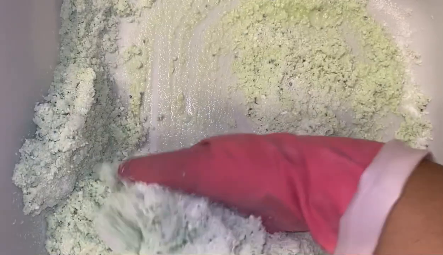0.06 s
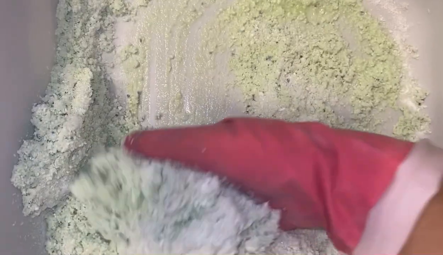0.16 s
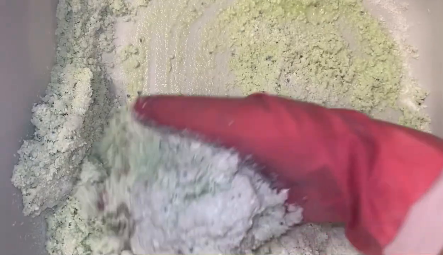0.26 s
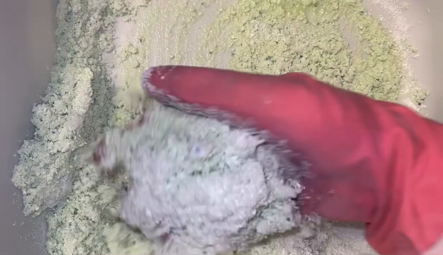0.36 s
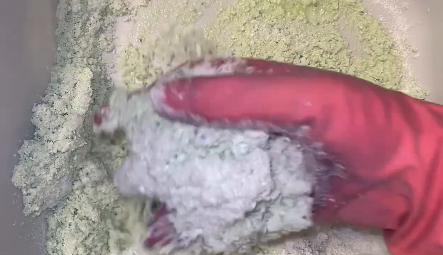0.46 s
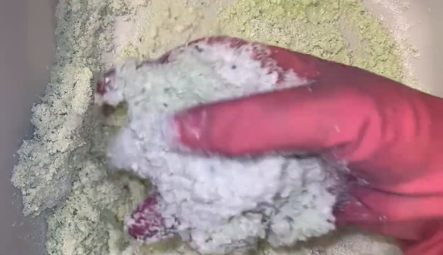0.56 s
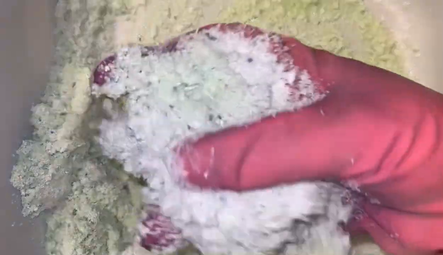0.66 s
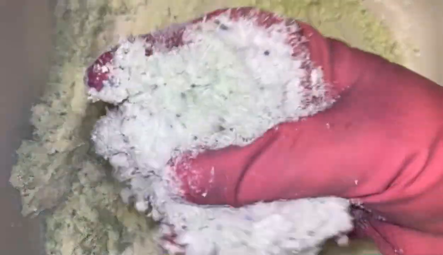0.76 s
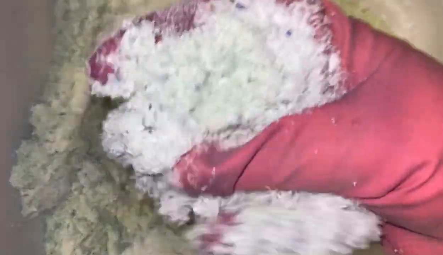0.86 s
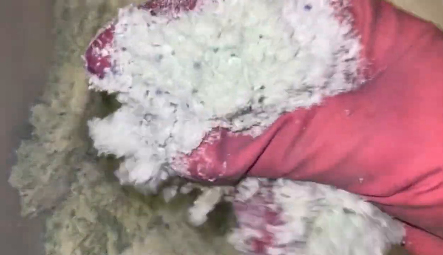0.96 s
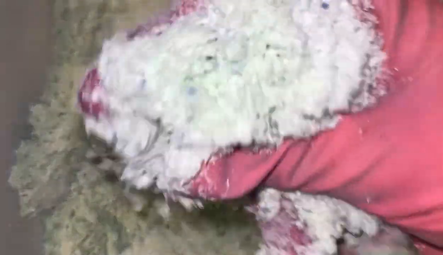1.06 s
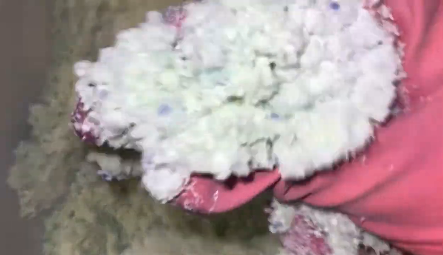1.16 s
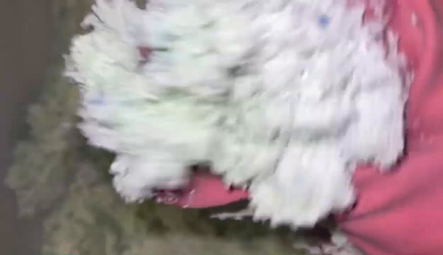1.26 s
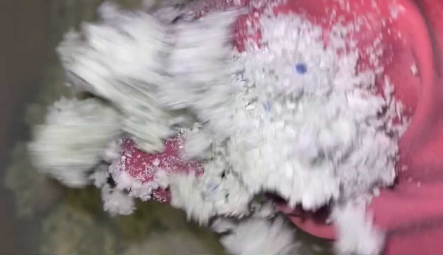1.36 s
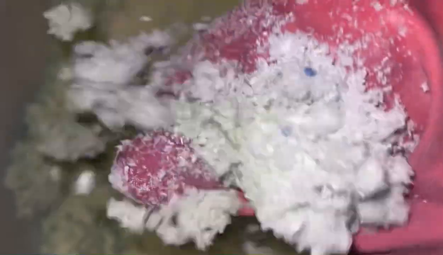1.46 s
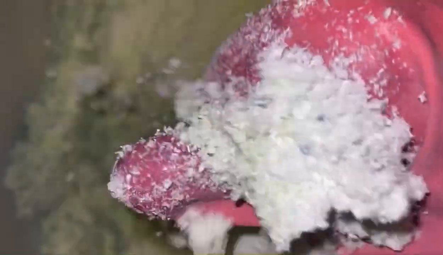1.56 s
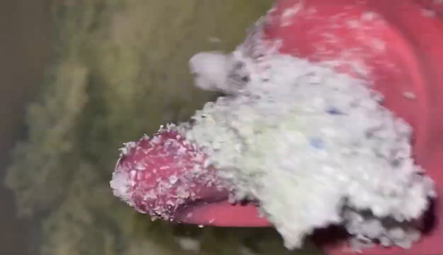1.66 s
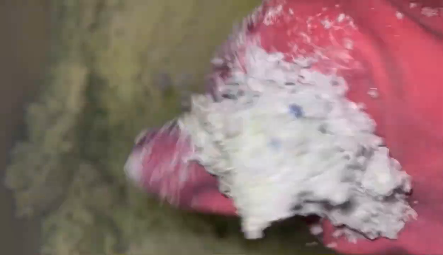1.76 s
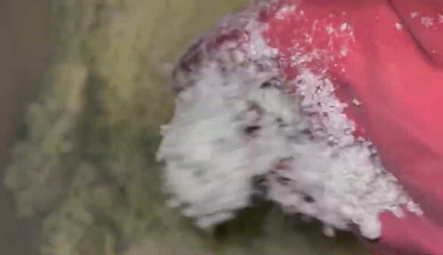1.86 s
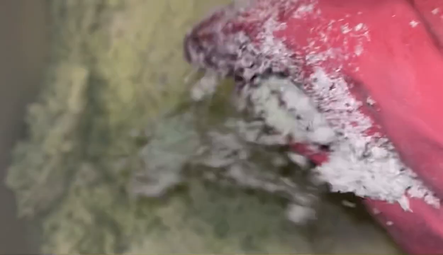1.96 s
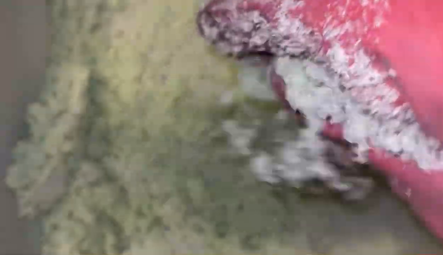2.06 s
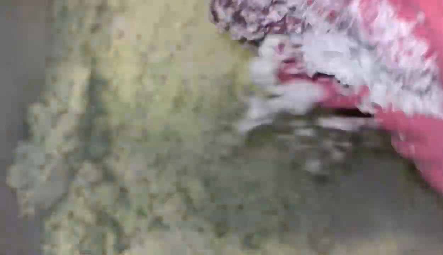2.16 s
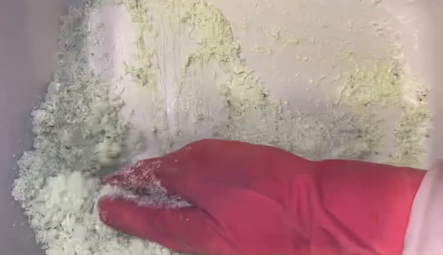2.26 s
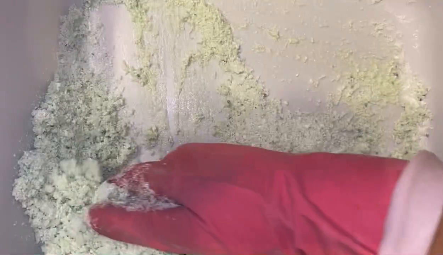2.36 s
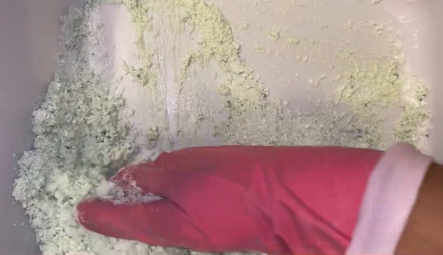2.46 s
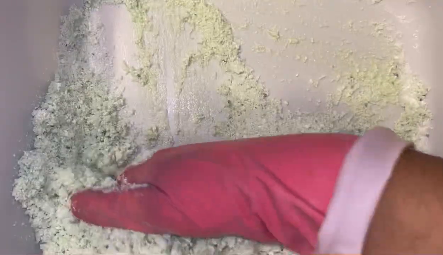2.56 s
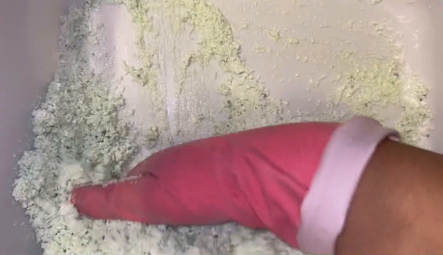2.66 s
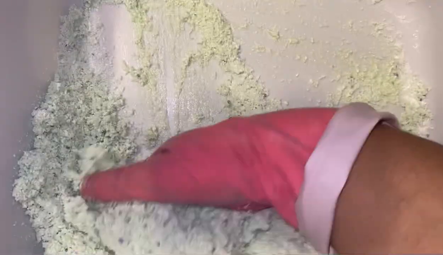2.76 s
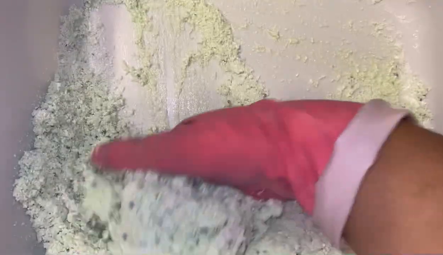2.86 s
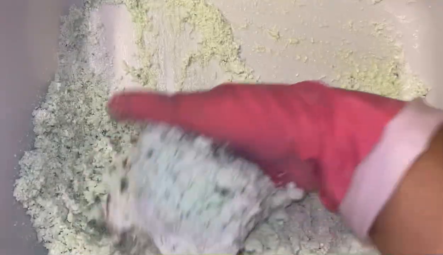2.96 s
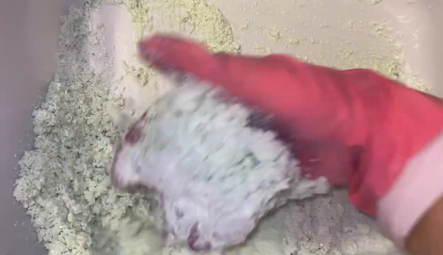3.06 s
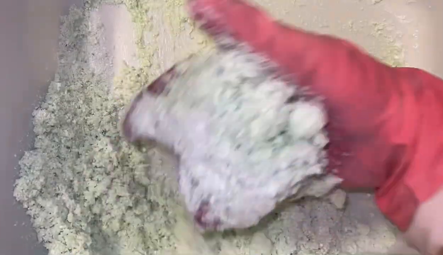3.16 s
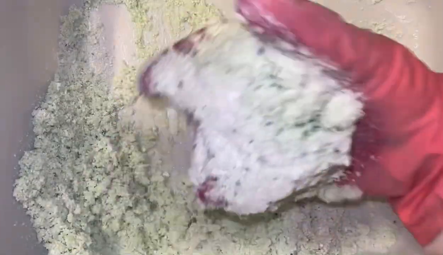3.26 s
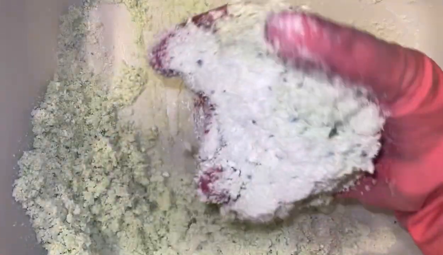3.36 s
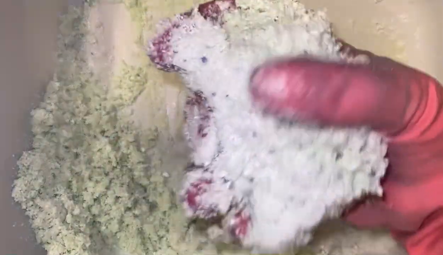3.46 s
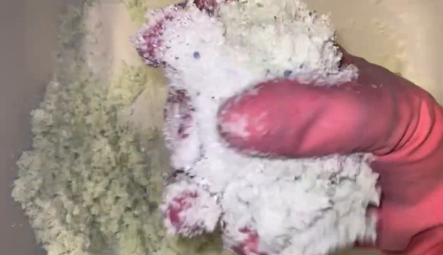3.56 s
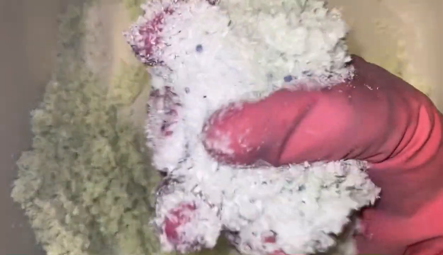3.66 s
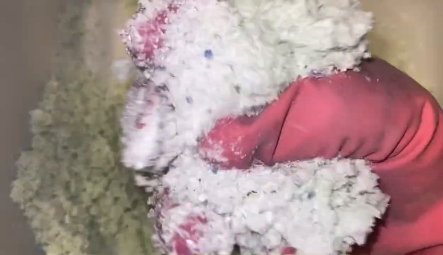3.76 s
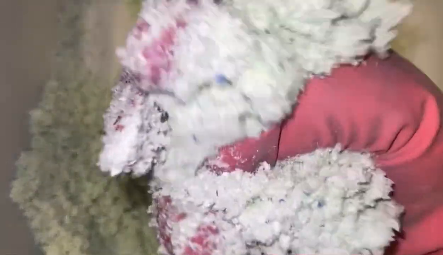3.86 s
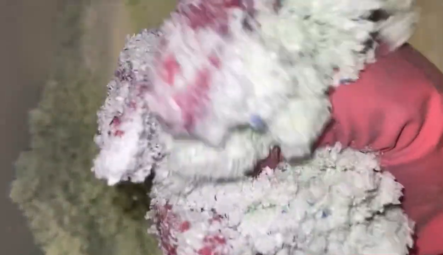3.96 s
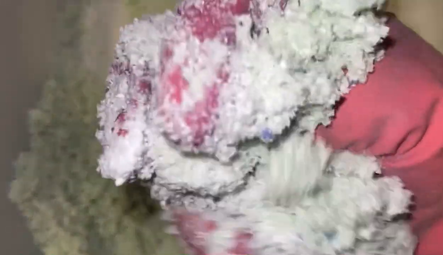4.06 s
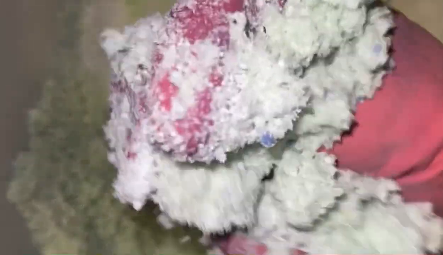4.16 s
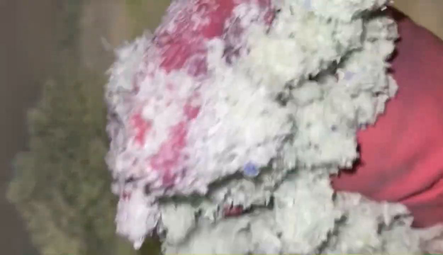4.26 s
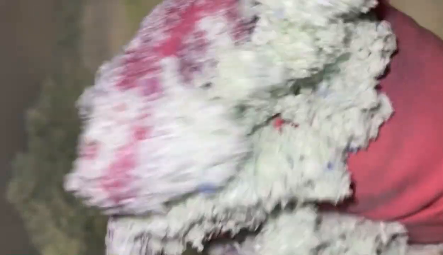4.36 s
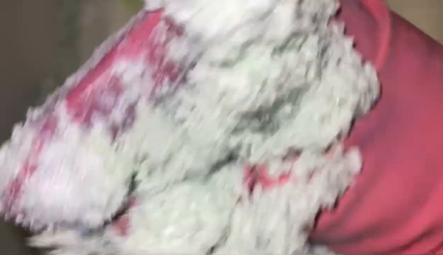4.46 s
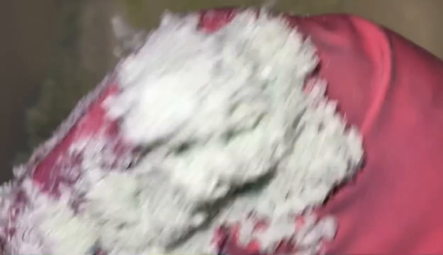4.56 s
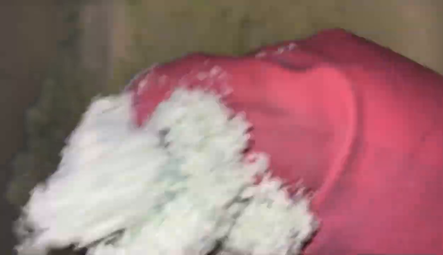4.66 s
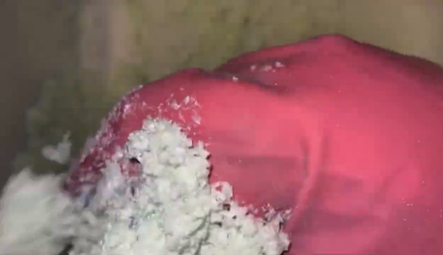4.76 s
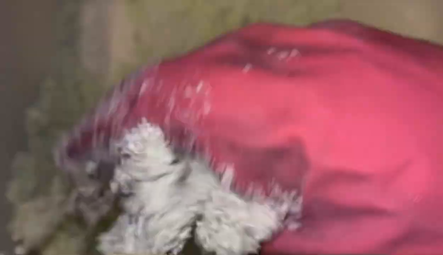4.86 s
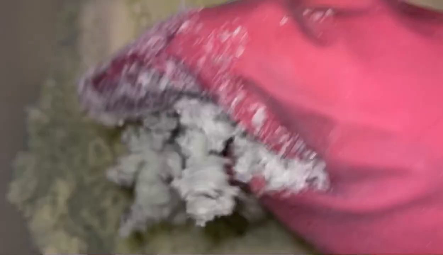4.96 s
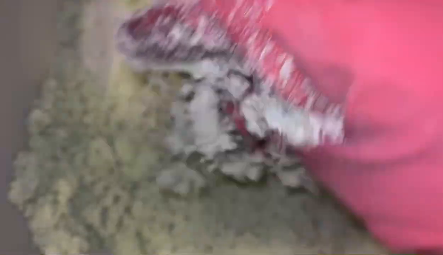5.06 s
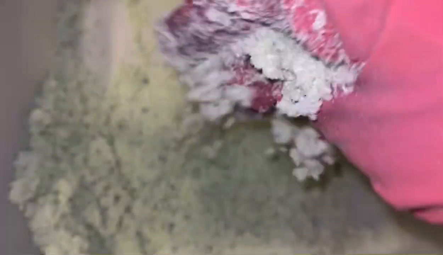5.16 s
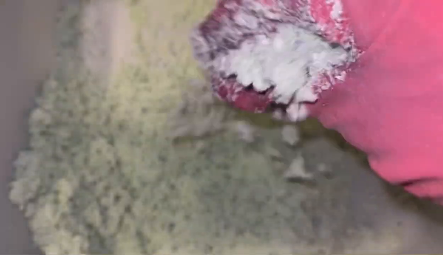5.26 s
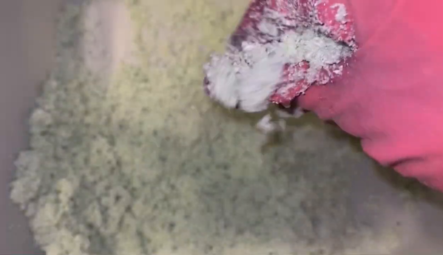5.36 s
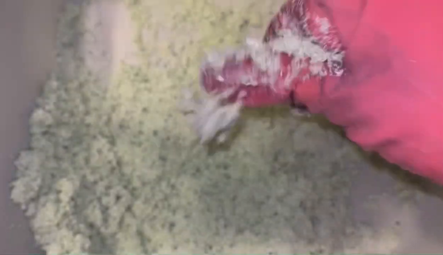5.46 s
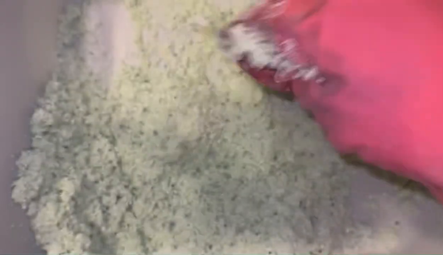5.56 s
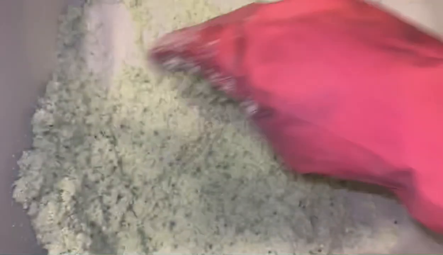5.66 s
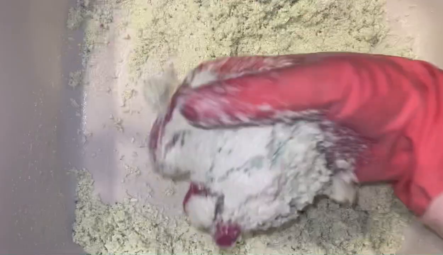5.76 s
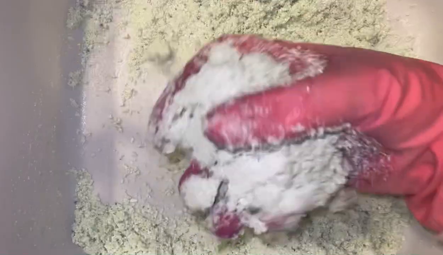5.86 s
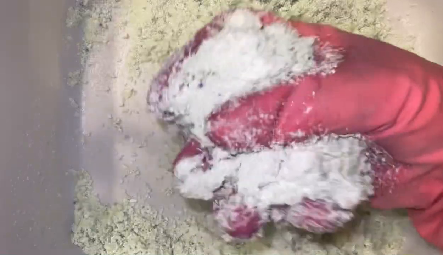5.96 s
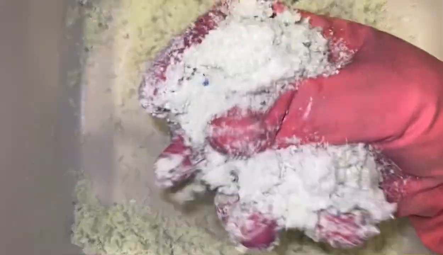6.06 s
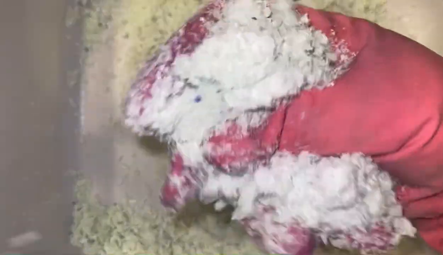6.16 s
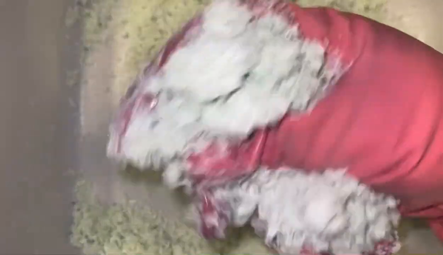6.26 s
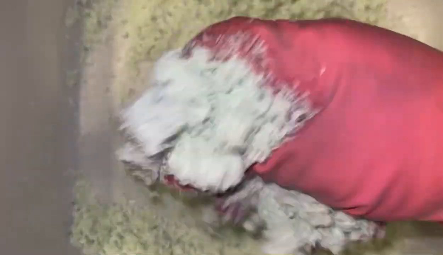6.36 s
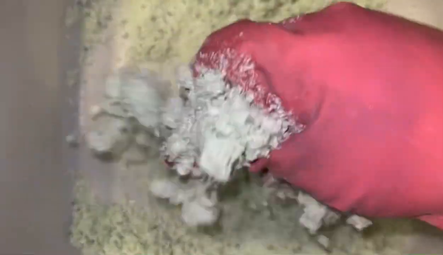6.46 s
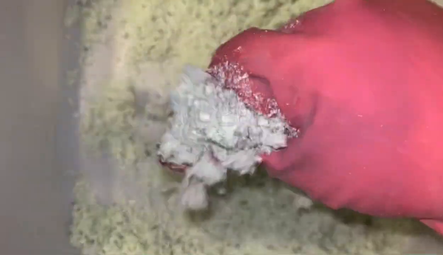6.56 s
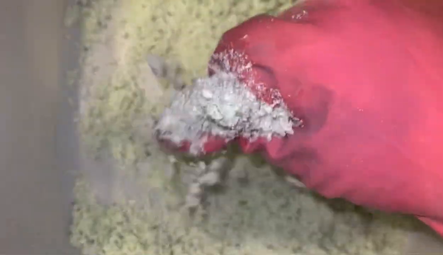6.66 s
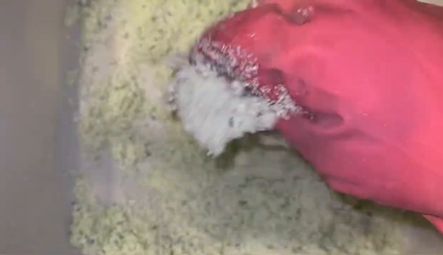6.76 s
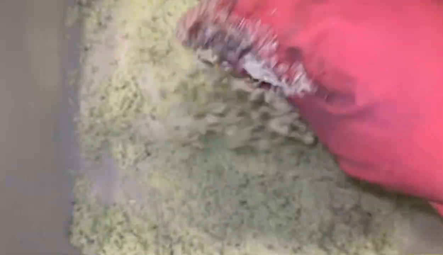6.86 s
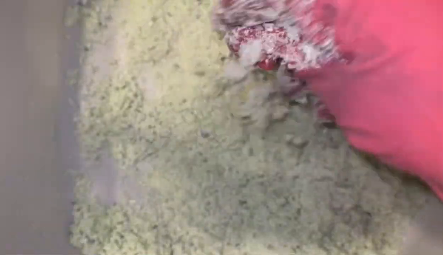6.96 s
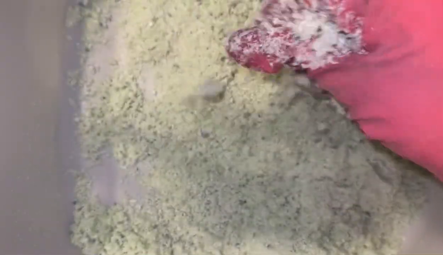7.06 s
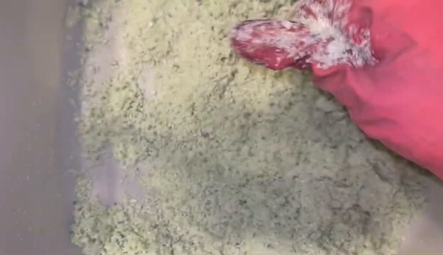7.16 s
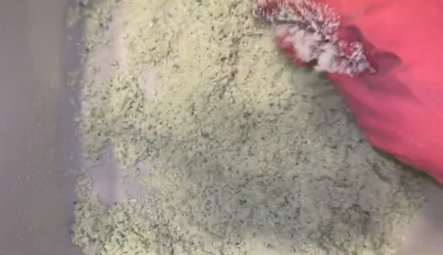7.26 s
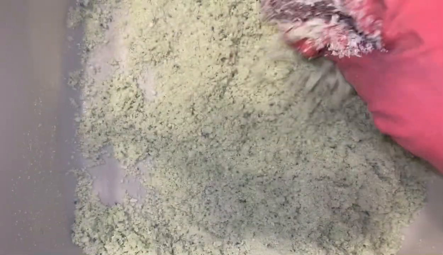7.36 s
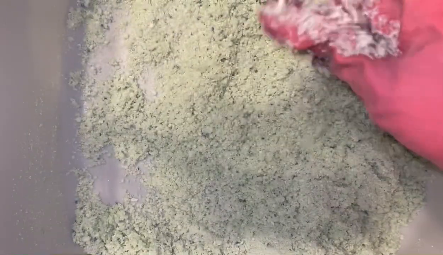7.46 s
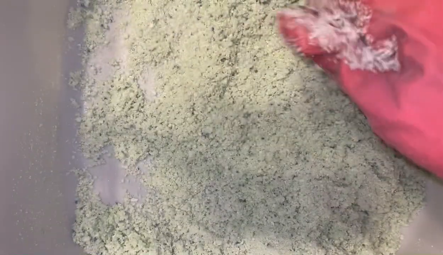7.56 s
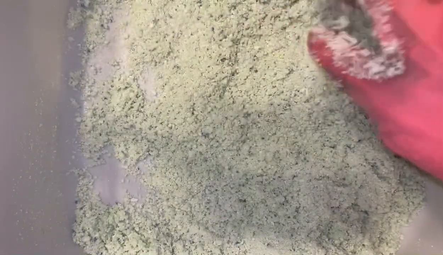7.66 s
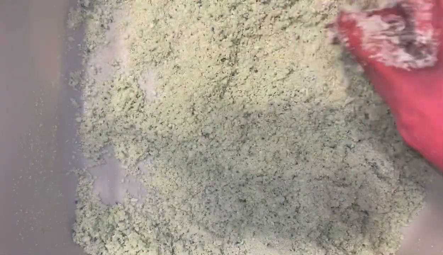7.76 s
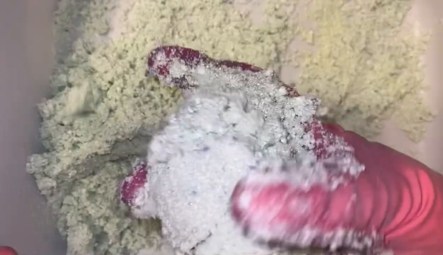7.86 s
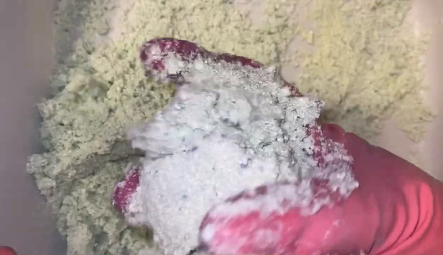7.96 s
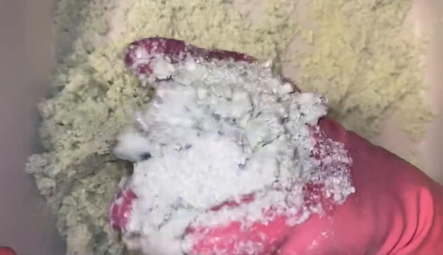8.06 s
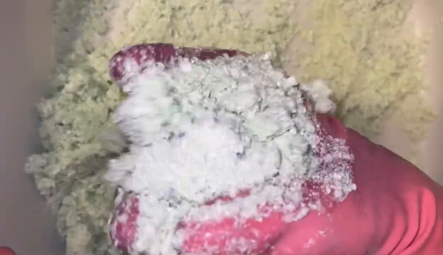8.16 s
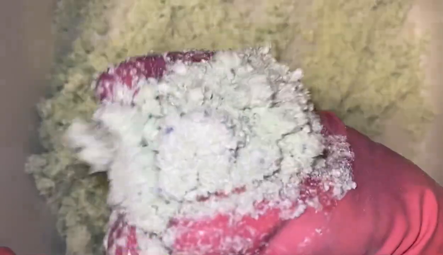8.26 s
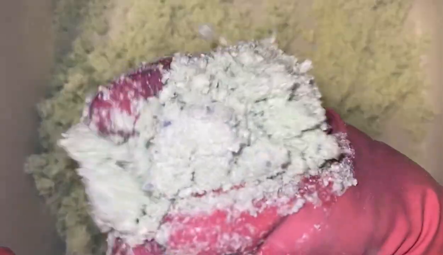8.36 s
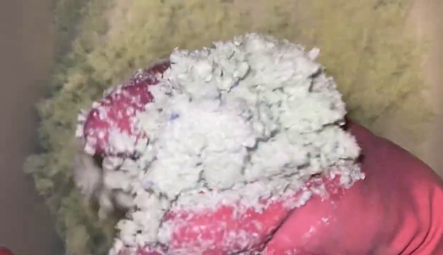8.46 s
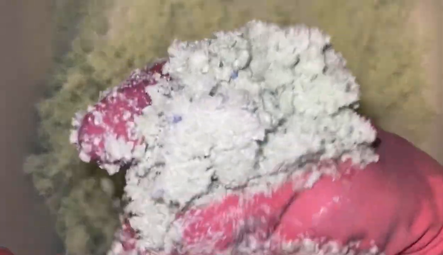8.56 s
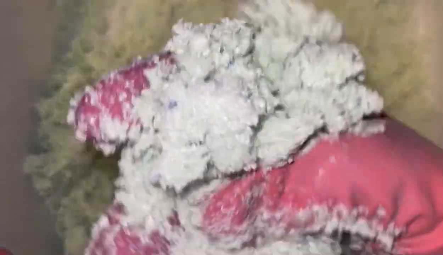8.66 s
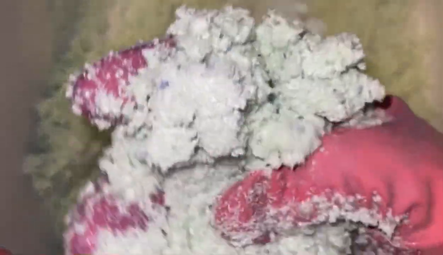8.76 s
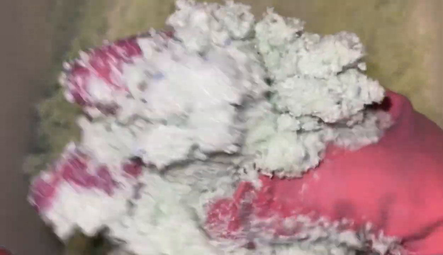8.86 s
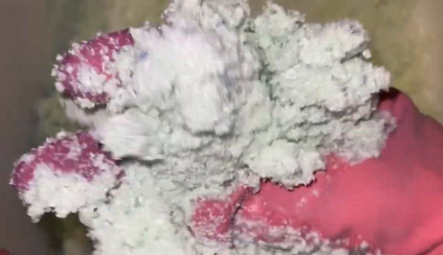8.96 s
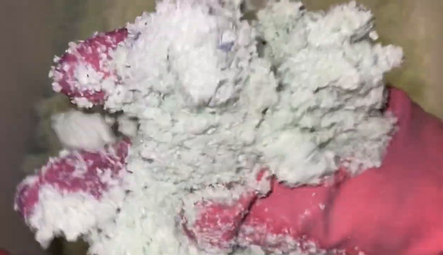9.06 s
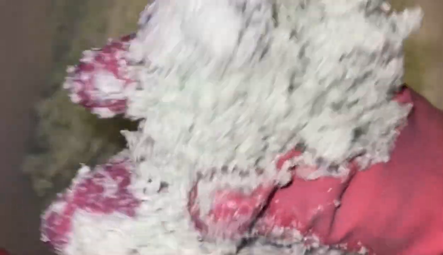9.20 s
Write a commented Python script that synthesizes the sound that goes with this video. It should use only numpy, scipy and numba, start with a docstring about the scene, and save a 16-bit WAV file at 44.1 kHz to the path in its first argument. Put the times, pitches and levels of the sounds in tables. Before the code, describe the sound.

A gloved hand rubs the plastic briefly, then crushes moist cleaning powder with sandy crackle, sharp snaps and soft wet smacks. Crumbling lumps thump the tub floor. After a half-second gritty scrape, two more strong bursts of crunching and falling lumps follow, thinning into quieter fizz and isolated cracks. Recorded close by a phone in a small, quietly rumbling indoor room.

```python
"""A rubber-gloved hand squeezes damp cleaning powder in a plastic tub and lets it crumble, close to a phone.
Slipping grains fizz as streams of tiny random clicks; cracks are short bursts of such clicks with ringing.
Fallen lumps thud as fading tones of the tub, wet pockets pop, and hard grains tick as flashes of noise.
The glove scrapes the plastic with clicks through moving filters, and one long push rasps and drones.
Filtered noise and a wavering hum make the low room rumble; two microphone ports hear it all in stereo."""
import sys
import numpy as np
from scipy import signal
from scipy.fft import rfft, irfft, next_fast_len
from scipy.io import wavfile
from numba import njit

SR = 44100
rng = np.random.default_rng(int(sys.argv[2]) if len(sys.argv) > 2 else 0)


def unload_wav(signal):
    """Save mono or channel-first audio to the path in sys.argv[1] as 16-bit WAV at rate SR, clipped to [-1, 1]."""
    wavfile.write(
        sys.argv[1],
        SR,
        np.round(np.clip(np.atleast_2d(signal).T, -1, 1) * 32767).astype(np.int16),
    )


N = 407043  # length in samples
TIME = np.arange(N) / SR
SIZE = next_fast_len(N + 8192)  # room for filter tails
FREQ = np.fft.rfftfreq(SIZE, 1 / SR)

# tone colour of wet, splatting powder: [f/Hz, level per Hz/dB]
SPLAT = [(150, -4.5), (380, 4), (620, -9), (850, -2.5), (1100, -2), (1350, -3), (1700, -8.5), (2600, -20),
         (5000, -39)]


def undb(db):
    """Turn decibels into a gain."""
    return 10 ** (np.asarray(db) / 20)


def unit(x):
    """Scale a sound to rms 1."""
    return x / np.sqrt(np.mean(x ** 2))


def curve(rows, column=1):
    """Join one column of a control table by lines, with a value at every sample."""
    rows = np.array(rows)
    return np.interp(TIME, rows[:, 0], rows[:, column])


def across(points):
    """Join (f/Hz, value) points by lines on a log-frequency axis."""
    hz, value = np.transpose(points)
    return np.interp(np.log(FREQ + 1), np.log(hz), value)


def colour(x, points):
    """Filter to a given spectrum without sounding early; white noise keeps its power."""
    cepstrum = irfft(np.log(unit(undb(across(points)))), SIZE)
    # folding the cepstrum onto positive times gives a minimum-phase filter
    cepstrum[1:SIZE // 2] *= 2
    cepstrum[SIZE // 2 + 1:] = 0
    response = np.exp(rfft(cepstrum))
    return irfft(rfft(x, SIZE) * response, SIZE)[:N]


def walk(rate):
    """Wander between random levels, rate a second, joined by lines; spread near 1."""
    steps = rng.standard_normal(N // 20)
    return np.interp(TIME * rate, np.arange(len(steps)), steps)


def grains(rate, spread_db):
    """Scatter tiny clicks of unequal size at random, about rate a second, rms 1."""
    hit = rng.random(N) < rate / SR
    size = undb(spread_db * np.minimum(rng.exponential(size=N), 5))
    return unit(hit * size * rng.choice([-1, 1], N))


def add(track, s, sound):
    """Mix a sound into the track at time s."""
    start = max(int(s * SR), 0)
    track[start:start + len(sound)] += sound[:N - start]


@njit
def resonate(x, hz, damping):
    """Band-pass whose centre can move every sample; damping is its width over its centre."""
    y, middle, low = np.empty(len(x)), 0., 0.
    for i in range(len(x)):
        g = np.tan(np.pi * hz[i] / SR)
        v = (middle + g * (x[i] - low)) / (1 + g * (g + damping))
        middle, low, y[i] = 2 * v - middle, low + 2 * g * v, damping * v
    return y


def band(x, hz, width):
    """Keep a fixed band of a sound with two filters in a row, rms 1."""
    centre = np.full(N, 1. * hz)
    once = resonate(x, centre, width / hz)
    return unit(resonate(once, centre, width / hz))


def swell(s, length):
    """Rise and fall smoothly around time s, peak 1."""
    return np.exp(-np.minimum((2 * (TIME - s) / length) ** 2, 20))


def gesture(start, length, attack, release):
    """Attack, hold and release one move; also give its progress from 0 to 1."""
    outside = np.maximum(start - TIME, 0) / attack + np.maximum(TIME - start - length, 0) / release
    return np.exp(-np.minimum(outside, 20)), np.clip((TIME - start) / length, 0, 1)


def fist():
    """Slow pressure plus quick clenches, added as powers, drive the dry grinding and the wet smacking."""
    # slow pressure of the fist: [t/s, level of the grinding/dB]
    pressure = [(0, -54.5), (.22, -55.5), (1.1, -47.5), (1.7, -57), (2.1, -50.5), (2.87, -54.5),
                (3.38, -60.5), (3.8, -49.5), (4.75, -54.5), (5.15, -49.5), (5.66, -54.5), (5.72, -64.5),
                (5.79, -63), (5.92, -54), (6.07, -54.5), (6.3, -49), (6.83, -52.5), (7.38, -49.5),
                (7.52, -55), (7.8, -58.5), (7.98, -60.5), (8.35, -56), (9.23, -52.5)]
    # quick clenches of the fingers: [t at the tightest/s, length/s, dry grit level/dB, wet smacking level/dB]
    clenches = [(0.017, 0.061, -44, -68), (0.093, 0.13, -64, -53), (0.4, 0.21, -51, -67),
                (1.138, 0.13, -46, -60), (1.505, 0.26, -46, -60.5), (1.803, 0.14, -48.5, -56),
                (2.069, 0.042, -49, -47.5), (3.2, 0.12, -54.5, -52.5), (4.071, 0.049, -45, -49),
                (4.163, 0.11, -45, -52), (4.42, 0.17, -45.5, -60), (4.633, 0.18, -52.5, -54.5),
                (4.934, 0.075, -54, -56), (5.083, 0.11, -46, -58), (5.18, 0.09, -44.5, -51),
                (5.283, 0.14, -48.5, -51.5), (5.605, 0.13, -45.5, -72), (6.192, 0.074, -49, -69),
                (6.407, 0.12, -48, -53.5), (6.558, 0.075, -39.5, -44.5), (6.687, 0.071, -62, -61),
                (6.743, 0.11, -46.5, -52.5), (6.933, 0.15, -48.5, -55.5), (8.332, 0.18, -56, -62),
                (8.6, 0.14, -53, -73)]
    steady_wet_db = -9.5  # relative to the grinding

    dry_power = undb(curve(pressure)) ** 2
    wet_power = dry_power * undb(steady_wet_db) ** 2
    for s, length, dry_db, wet_db in clenches:
        clench = swell(s, length)
        dry_power = dry_power + (undb(dry_db) * clench) ** 2
        wet_power = wet_power + (undb(wet_db) * clench) ** 2
    return np.sqrt(dry_power), np.sqrt(wet_power)


def squeeze(grinding, smacking):
    """Countless grains slip past each other; coarser ones snap now and then."""
    # tone colour of grinding grit: [f/Hz, level per Hz/dB]
    grit_colour = [(250, -41), (600, -14), (900, -14), (1400, -2.5), (2100, -0.5), (2700, 0), (3400, -2),
                   (4200, -2.5), (5200, -0.5), (7500, -2.5), (10000, -5), (12000, -10), (13500, -13.5),
                   (15500, -23)]
    fizz = grains(rate=7000, spread_db=0.0) * undb(0.57 * walk(160) + 1.34 * walk(25))
    snaps = grains(rate=110, spread_db=2.0)
    grit = colour(fizz + undb(-6.0) * snaps, grit_colour) * grinding
    # the wet inside of the lump smacks lower and more unevenly
    smack = colour(grains(rate=900, spread_db=2.5) * undb(2.75 * walk(70)), SPLAT)
    return grit + smack * smacking


def strokes(width=0.64, hollow_width=0.093, hollow_db=3.5, roam=0.045):
    """The glove sticks and slips on the plastic; the hollow under the hand tunes the rub and rings in its middle."""
    # strokes of the glove over the tub floor:
    # [start t/s, length/s, level/dB, swell along the stroke/dB, hollow at the start f/Hz, at the end f/Hz]
    stroke_rows = [(0, 0.022, -41.5, -9, 945, 830), (0.042, 0.048, -53, -1, 800, 470),
                   (0.1, 0.027, -54, -2, 800, 596), (0.175, 0.012, -55.5, 0, 900, 800),
                   (0.221, 0.012, -51.5, 0, 950, 860), (1.81, 0.066, -44.5, -6, 1780, 1700),
                   (2.296, 0.48, -54.5, 10.5, 770, 845), (2.789, 0.035, -47, -9, 840, 790),
                   (2.873, 0.044, -50, 0.5, 796, 940), (2.96, 0.096, -57.5, -3, 845, 915),
                   (5.581, 0.044, -43.5, 4, 1690, 1550), (6.755, 0.022, -57, -6, 1900, 1880),
                   (6.95, 0.076, -53.5, 4, 1850, 1750), (7.2, 0.009, -52, -2, 750, 700),
                   (7.244, .19, -54, 3, 1850, 1600), (7.48, 0.014, -49.5, -2.5, 1850, 1750),
                   (7.524, 0.047, -58, -1, 1600, 1920), (7.623, .02, -53.5, -5, 725, 600),
                   (7.65, .012, -56, -1, 560, 520), (7.715, .01, -59, -2, 740, 680),
                   (7.775, 0.085, -60.5, 1, 583, 695), (8.274, 0.025, -52, -8, 800, 760),
                   (8.346, 0.02, -49.5, -10, 754, 710)]
    attack_s, release_s = 0.0089, 0.029

    level, hz_sum = 0, 0
    for start, length, db, swell_db, start_hz, end_hz in stroke_rows:
        contact, progress = gesture(start, length, attack_s, release_s)
        stroke = contact * undb(db + swell_db * progress)
        level = level + stroke
        hz_sum = hz_sum + stroke * (start_hz + (end_hz - start_hz) * progress)
    friction = grains(rate=7000, spread_db=1) * undb(2.2 * walk(200) + 2.2 * walk(45))
    # the louder stroke counts more for the pitch, which also roams a little
    hz = hz_sum / level * np.exp(roam * walk(55))
    rub = resonate(friction, hz, width)
    # a low hollow rings more strongly than a high one
    ring = undb(hollow_db) * 800 / hz * resonate(rub, hz, hollow_width)
    tilt = [(200, 6.0), (600, -4.0), (2400, -6), (5000, 0.5), (12000, -6.0)]  # [f/Hz, level per Hz/dB]
    return unit(colour((rub + ring) / np.sqrt(hz), tilt)) * level


def shake(grinding):
    """The harder the hand works, the more the tub booms; heavy falling loads make its floor flex deeply."""
    # tone colour of the booming tub: [f/Hz, level per Hz/dB]
    boom_colour = [(20, -52), (38, -29), (60, 1), (92, 1), (118, 0.5), (145, 0.5), (195, -9.5), (236, -2.5),
                   (310, -17), (450, -18.5), (800, -20), (2000, -68)]
    # deep flexing of the floor under falling loads: [t/s, length/s, level/dB]
    flexes = [(1.31, 0.13, -44), (1.595, 0.15, -40), (2.09, 0.17, -43.5), (3.852, 0.18, -51),
              (4.95, 0.32, -54), (5.178, 0.25, -43), (6.96, 0.27, -48)]
    flex_rest_db = -66.5  # the floor never quite stops moving
    boom_db, usual_grinding_db = -51, -52  # boom level when the grinding is at its usual level
    growth = 0.74  # dB of boom gained per dB of grinding

    boom = colour(grains(rate=130, spread_db=1.5), boom_colour)
    boom = boom * undb(boom_db) * (grinding / undb(usual_grinding_db)) ** growth
    deep = [(20, -38), (30, -10), (41, 4.5), (55, -2.0), (80, -26), (200, -63)]  # [f/Hz, level per Hz/dB]
    flex = colour(rng.standard_normal(N), deep)
    load = sum(undb(db) * swell(s, length) for s, length, db in flexes)
    return boom + flex * (undb(flex_rest_db) + load)


def room():
    """Filtered noise rumbles with wavering bass; standing waves hum and a machine drones somewhere in the house."""
    # tone colour of the room rumble: [f/Hz, level per Hz/dB]
    room_colour = [(20, -26), (36, -26), (52, -8.5), (70, 6), (102, -1.5), (135, -4), (167, -0.5),
                   (196, -14.5), (232, -13.5), (300, -22.5), (600, -21), (2000, -39.5), (12000, -67)]
    # standing waves of the room: [f/Hz, width/Hz, level/dB]
    room_waves = [(64.8, 10, -60), (107.1, 5.6, -65.5), (138.74, 6.5, -60), (164.9, 12, -57.5)]
    rumble_db, bass_waver_db = -53, 2.5
    hum_db, hum_hz, hum_waver_db = -59, 71, 2

    rumble = colour(rng.standard_normal(N), room_colour)
    bass = signal.sosfiltfilt(signal.butter(2, 250, fs=SR, output="sos"), rumble)
    bass_change = bass * (undb(bass_waver_db * walk(9)) - 1)
    waves = sum(band(rng.standard_normal(N), hz, width) * undb(db) for hz, width, db in room_waves)
    phase = 2 * np.pi * np.cumsum(hum_hz * (1 + .012 * walk(3.09))) / SR
    machine = unit(np.sin(phase) * undb(hum_waver_db * walk(2.35)))
    return undb(rumble_db) * (rumble + bass_change) + waves + undb(hum_db) * machine


def pops(grinding, level_db=-10, low_hz=850, high_hz=6000, spread_db=3.0, count=1500):
    """Tiny crumbs break off the paste, each with a dry tick pitched by its size."""
    t = np.arange(int(SR / 40)) / SR
    cycles = 4  # periods until a tick has faded to 1/e
    out = np.zeros(N)
    for when, fineness, luck in rng.random((count, 3)):
        hz = low_hz * (high_hz / low_hz) ** fineness
        # fine crumbs ring for less time, so they start stronger
        size = np.sqrt(hz) * undb(spread_db * min(-np.log(1 - luck), 3))
        add(out, when * N / SR, size * np.sin(2 * np.pi * hz * t) * np.exp(-t * hz / cycles))
    return unit(out) * undb(level_db) * grinding


def lesser_crunches(grinding, count=6):
    """Small cracks come at random moments and grow with the grinding; rows like those of the big ones."""
    top_db, body_db, spread_db = 4.5, 3.5, 1  # top and body relative to the grinding
    length_s, low_hz, high_hz = 0.0035, 1700, 6100
    rows = []
    for when, crispness, dampness, pocket in rng.random((count, 4)):
        db = 20 * np.log10(grinding[int(when * N)])
        top = db + top_db + spread_db * (crispness - .5)
        body = db + body_db + spread_db * (dampness - .5)
        rows.append((when * N / SR, top, body, length_s, low_hz * (high_hz / low_hz) ** pocket))
    return rows


def crunches(rows, lead=0.39, burst_at=.25, snap_db=8.5, crumble_db=-24, crumble_s=0.027,
             pocket_db=4, pocket_width=0.13, pulp_hz=1180, pulp_width=0.17):
    """Each crack is an avalanche of grains that swells, bursts and trails off, ringing an air pocket and wet pulp."""
    # tone colour of the crisp crust: [f/Hz, level per Hz/dB]
    crisp_colour = [(900, -24), (1600, -8.5), (2000, -1), (3000, 1), (4200, -1.5), (5400, -0.5), (7500, 2),
                    (10000, -4.5), (13000, -8.5), (15500, -20)]
    t = np.arange(-int(SR / 50), int(SR / 12)) / SR
    after = np.maximum(t, 0)
    top, body, snaps = np.zeros((3, N))
    pocket, pulp = np.full(N, 3000.), np.full(N, 1. * pulp_hz)  # ringing pitches in Hz
    chances = 2 * rng.random(len(rows)) - 1
    for (s, top_db, body_db, length, hz), chance in zip(rows, chances):
        length = max(length, .001)
        # long crunches also build up slowly, short ones snap
        build = np.exp(np.minimum(t, 0) / (lead * length))
        burst_fade = np.exp(-(after / (0.76 * length)) ** 0.81)
        crumbling = undb(crumble_db) * np.exp(-after / crumble_s)
        avalanche = build * (burst_fade + crumbling)
        burst = s + burst_at * length
        add(top, burst + t[0], undb(top_db) * avalanche)
        add(body, burst + t[0], undb(body_db) * avalanche)
        # at the height of the avalanche the crust gives way in one sharp snap
        add(snaps, burst, undb([top_db + snap_db]))
        # both pitches hold until the next crack
        onset = max(int((s - length) * SR), 0)
        pocket[onset:] = hz
        pulp[onset:] = pulp_hz * np.exp(0.25 * chance)
    crack = top * grains(rate=14000, spread_db=2.0) + snaps
    crack = crack + undb(pocket_db) * resonate(crack, pocket, pocket_width)
    damp = body * grains(rate=14000, spread_db=1.5)
    damp = damp + undb(-2.0) * resonate(damp, pulp, pulp_width)
    return colour(crack, crisp_colour) + colour(damp, SPLAT)


def lumps(rise_s=0.0029, octaves=0.8):
    """Soft lumps ring the tub floor; their size and landing place pick the tones that speak."""
    # lumps landing on the tub floor: [t/s, peak level/dB, centre of the thud f/Hz]
    landings = [(0.404, -47, 258), (0.503, -37.5, 160), (0.964, -45, 260), (1.033, -20, 230),
                (1.074, -34, 330), (1.091, -26, 108), (1.124, -33, 90), (1.289, -32, 107), (1.5, -32, 151),
                (1.549, -31, 105), (1.637, -35.5, 119), (1.984, -28.5, 237), (2.024, -30.5, 92),
                (2.095, -33.5, 126), (2.203, -33, 168), (2.771, -43, 235), (3.789, -38, 70),
                (4.078, -26, 94.5), (4.147, -20.5, 150), (4.216, -37, 150), (4.266, -37, 160),
                (4.329, -22, 147), (4.4, -31.5, 146), (4.442, -37.5, 148), (4.755, -39, 85),
                (4.811, -38, 120), (4.94, -37, 62), (5.014, -34, 197), (5.062, -27.5, 240),
                (5.101, -29.5, 130), (5.13, -36, 300), (5.183, -38, 220), (5.193, -21.5, 87),
                (5.685, -35, 228), (6.171, -33.5, 138), (6.288, -29.5, 105), (6.5, -23.5, 230),
                (6.536, -24.5, 236), (6.575, -25, 108), (6.607, -34, 298), (6.728, -28, 198),
                (6.892, -25.5, 124), (7.278, -39, 141), (7.612, -49, 400), (7.885, -38, 110),
                (8.345, -32, 126), (8.559, -41, 62), (8.842, -36, 210), (8.879, -39, 70)]
    # ringing tones of the loaded tub: [f/Hz, level/dB, time to fade by 60 dB/s]
    tub_tones = [(63, -6, 0.14), (91.1, -0.5, 0.21), (137.3, 1, 0.15), (165.7, -1.5, 0.087),
                 (234.8, 1, 0.087), (281, -4.5, 0.08), (334, -5.5, 0.051), (424, -3, 0.065)]
    t = np.arange(int(SR / 3)) / SR
    out = np.zeros(N)
    detune = 1 + 0.048 * rng.standard_normal((len(landings), len(tub_tones)))
    for (s, peak_db, centre_hz), shifts in zip(landings, detune):
        thud = 0
        for (hz, db, t60), shift in zip(tub_tones, shifts):
            # tones far from the centre of the thud are weaker
            share = undb(db) / (1 + (np.log2(hz / centre_hz) / octaves) ** 2)
            fade = np.exp(-np.log(1000) * t / t60)
            thud = thud + share * np.sin(2 * np.pi * hz * shift * t) * fade
        thud = thud * (1 - np.exp(-t / rise_s))
        add(out, s, undb(peak_db) * thud / np.abs(thud).max())
    return out


def ticks():
    """A single hard grain snaps, dry and bright: a flash of noise fading in about a millisecond."""
    # snapping grains: [t/s, level before the band filter/dB]
    tick_rows = [(.437, -38), (.534, -37), (.543, -33), (3.134, -35), (3.226, -33), (3.234, -33),
                 (3.243, -37), (3.287, -35), (3.346, -48), (3.499, -37), (4.0393, -27), (4.713, -36),
                 (5.7045, -34), (5.7555, -41.5), (5.968, -35), (5.986, -38), (6.0185, -33), (6.03, -35),
                 (6.1045, -34)]
    fade_s, centre_hz, width_hz = 0.0015, 6360, 12000
    t = np.arange(int(SR / 100)) / SR
    out = np.zeros(N)
    for s, db in tick_rows:
        add(out, s, undb(db) * np.exp(-t / fade_s) * rng.choice([-1, 1], len(t)))
    return resonate(out, np.full(N, 1. * centre_hz), width_hz / centre_hz)


def smacks():
    """A wet pocket in the paste opens with a hollow pop: a tone that rises and fades at once."""
    # popping pockets: [t/s, peak level of the envelope/dB, pitch f/Hz]
    smack_rows = [(.895, -37, 1090), (.955, -28, 1190), (1.031, -31, 1290), (1.0439, -28.5, 1280),
                  (1.093, -32.5, 1260), (1.104, -34, 1220), (1.147, -34, 1230), (1.164, -35, 1100),
                  (1.457, -38, 1100), (1.464, -35, 1130), (1.578, -35, 1130), (1.793, -32, 1140),
                  (2.095, -53, 1130), (2.21, -36.5, 990), (3.047, -43, 886), (3.062, -43, 1290),
                  (3.144, -41, 1160), (3.201, -29.5, 1280), (4.07, -26.5, 1160), (4.124, -31, 1280),
                  (4.145, -28.5, 1260), (4.185, -29, 1290), (4.326, -31, 1170), (5.063, -27.5, 1200),
                  (5.265, -33, 2150), (5.368, -37.5, 1200), (5.368, -38, 2150), (5.618, -33, 1450),
                  (5.679, -43, 990), (6.101, -36, 1180), (6.172, -35, 1050), (6.46, -39, 1910),
                  (6.4865, -30.5, 1140), (6.499, -42, 1200), (6.855, -40, 1340), (6.891, -34, 1160),
                  (7.281, -35, 810), (7.384, -39, 1340), (8.576, -40.5, 770), (8.588, -48, 970),
                  (9.134, -39, 945), (9.144, -46, 900), (9.181, -42, 2600)]
    rise_s = 0.00085  # time to the peak of a pop
    t = np.arange(int(SR / 50)) / SR
    envelope = t / rise_s * np.exp(1 - t / rise_s)
    out = np.zeros(N)
    for s, peak_db, hz in smack_rows:
        add(out, s, undb(peak_db) * envelope * np.sin(2 * np.pi * hz * t))
    return out


def push(coarse_db=-8, heap_full=.88):
    """Grit dragged between palm and tub rasps over a wide band, shakes the floor and swells as powder heaps up."""
    # tone colour of the scraping grit: [f/Hz, level per Hz/dB]
    scrape_colour = [(150, -10), (300, -4.5), (550, -6.5), (900, -5), (1300, -4.5), (2000, -8.5),
                     (3100, -3.5), (4200, -12), (5400, -6.5), (7500, -13.5), (10000, -14.5), (12500, -19),
                     (15500, -49)]
    start_s, length_s, attack_s, release_s = 2.237, 0.541, 0.0012, 0.015
    scrape_db, fade_db, sag_db = -36.5, -2.5, 6.5  # the push slackens most halfway
    heap_db, heap_growth_db, heap_hz, heap_width_hz = -42, 20, 1320, 1900
    palm_db, palm_hz, palm_width_hz = -48.5, 3270, 890
    drone_db, drone_hz, drone_width_hz = -51.5, 239, 43

    rasp = grains(rate=12000, spread_db=1.2) * undb(1.1 * walk(300) + .5 * walk(40))
    # coarse grains catch and let go among the fine ones
    rasp = rasp + undb(coarse_db) * grains(rate=500, spread_db=0.5)
    contact, progress = gesture(start_s, length_s, attack_s, release_s)
    scrape_level = undb(scrape_db + fade_db * progress - sag_db * np.sin(np.pi * progress))
    scrape = colour(rasp, scrape_colour) * scrape_level
    # the heap before the palm grinds lower, and loudest when it is fullest
    heap_level = undb(heap_db - heap_growth_db * np.abs(progress - heap_full) + 1.5 * walk(60))
    heap = band(grains(rate=2700, spread_db=2.5), heap_hz, heap_width_hz) * heap_level
    # the hollow of the palm rings, and the tub floor drones
    palm = band(grains(rate=1300, spread_db=3.5), palm_hz, palm_width_hz) * undb(palm_db)
    drone = band(rng.standard_normal(N), drone_hz, drone_width_hz) * undb(drone_db)
    return (scrape + heap + palm + drone) * contact


def slow_squeeze():
    """Under the last slow, even pressure only the finest grains slip and fizz."""
    # tone colour of the finest grains: [f/Hz, level per Hz/dB]
    fine_colour = [(1500, -15), (3300, -9), (5300, 5.5), (7500, -1.5), (10000, 1), (13000, -10),
                   (15500, -27)]
    contact, _ = gesture(start=8.28, length=1, attack=0.28, release=0.28)  # seconds
    return colour(grains(rate=11000, spread_db=2.0), fine_colour) * contact * undb(-54.5)


def tub_air(x):
    """The air between the tub walls rings faintly with everything that happens inside."""
    # standing waves of the air in the tub: [f/Hz, width/Hz, added share/dB]
    air_waves = [(232, 8.2, -12.5), (820, 20, -15), (1013, 23, -12), (1173, 14, -6), (1390, 42, -18),
                 (1930, 300, -10), (2430, 50, -2.5), (3490, 63, -12), (3950, 74, -8), (5050, 130, -10)]
    direct = undb(-0.37) * x  # reaches the phone without ringing the air
    return direct + sum(undb(db) * resonate(x, np.full(N, 1. * hz), width / hz) for hz, width, db in air_waves)


def ports(x, tub_t60=0.012, count=4):
    """Two microphone ports hear the direct sound out of step, plus short reflections whose mix drifts at random."""
    # lead of the left port: [f/Hz, phase/radians]
    port_phase = [(0, 0), (430, -0.3), (1640, -0.1), (2840, 1.1), (3450, 0.7), (5250, 0.2), (6800, 3.1),
                  (8180, 3.5), (9730, 6.2), (11600, 6.5), (12500, 9.3), (14700, 9.5), (15400, 12.5),
                  (16700, 12.7)]
    # how alike left and right sound: [f/Hz, likeness/0-1]
    port_likeness = [(100, 0.99), (260, 1), (480, 0.15), (800, 0.45), (1300, 0.85), (1900, 1), (2700, 0.24),
                     (3800, 0.52), (4500, 0.64), (5400, 0.69), (7300, 1), (9000, 0.84), (10300, 0.94),
                     (12000, 0.62), (13500, 1), (15500, 1)]
    # loudness between the ports: [f/Hz, left minus right/dB]
    port_balance = [(200, -0.5), (450, -4.5), (900, -1.5), (2000, -0.5), (2600, -2), (3500, 0),
                    (4400, -3.5), (5200, 0), (12000, 0)]

    t = np.arange(int(SR / 20)) / SR
    spectrum = rfft(x, SIZE)
    shares = np.array([walk(14) for _ in range(count)])
    shares = shares / np.sqrt(np.sum(shares ** 2, axis=0))
    reflected = 0
    for share in shares:
        # the walls scatter the sound in time but leave its colour alone
        walls = rfft(rng.standard_normal(len(t)) * np.exp(-np.log(1000) * t / tub_t60), SIZE)
        reflected = reflected + share * irfft(spectrum * walls / np.abs(walls), SIZE)[:N]
    likeness = np.clip(across(port_likeness), 0, 1)
    direct = np.sqrt((1 + likeness) / 2) * spectrum
    scattered = np.sqrt((1 - likeness) / 2) * rfft(reflected, SIZE)
    lag = np.exp(-1j * np.interp(FREQ, *np.transpose(port_phase)))
    lean = undb(across(port_balance) / 2)
    left = (direct + scattered) * lean
    right = (direct - scattered) * lag / lean
    return irfft(np.array([left, right]), SIZE)[:, :N]


def scene():
    """Put hand, powder and tub in front of the phone, with the room underneath."""
    # big cracks and splats of the damp mass:
    # [t/s, crisp top level/dB, damp body level/dB, length/s, ring of the air pocket f/Hz]
    big_cracks = [(0.252, -41.5, -49, 0.0038, 4300), (0.289, -41.5, -45, 0.0062, 1870),
                  (0.329, -41, -49, 0.013, 2010), (0.4036, -39, -40, 0.0041, 1900),
                  (0.42, -36.5, -44, 0.0027, 1930), (0.465, -34, -48, 0.0011, 3720),
                  (0.496, -37.5, -40, 0.003, 4900), (0.569, -43, -43.5, 0.0042, 3970),
                  (0.896, -41.5, -55, 0.004, 2000), (0.955, -31, -45, 0.0044, 1980),
                  (1.031, -33.5, -49, 0.0072, 1660), (1.042, -35.5, -44, 0.0032, 4280),
                  (1.09, -39, -39, 0.0031, 1700), (1.1, -38, -45, 0.0027, 2530),
                  (1.158, -44, -46, 0.0049, 3460), (1.28, -36, -46, 0.0087, 3830),
                  (1.467, -52, -42.5, 0.0052, 2060), (1.501, -49, -39.5, 0.0035, 2000),
                  (1.513, -37, -47, 0.0049, 5370), (1.545, -42, -38.5, 0.0045, 4070),
                  (1.5755, -38, -38.5, 0.003, 3700), (1.59, -34.5, -44, 0.003, 2570),
                  (1.611, -42, -43, 0.0025, 2080), (1.789, -50, -40, 0.0023, 1700),
                  (1.833, -49, -42, 0.0021, 1700), (1.938, -47, -43, 0.0029, 4000),
                  (1.967, -39, -41.5, 0.0033, 4000), (1.981, -34.5, -43, 0.0031, 2060),
                  (2.057, -43, -38, 0.0077, 2200), (2.075, -37.5, -43, 0.0064, 4100),
                  (2.0926, -35, -36.5, 0.0025, 2650), (2.137, -49, -47, 0.0023, 4500),
                  (2.179, -41, -43, 0.0028, 2770), (2.211, -38, -48, 0.0046, 1930),
                  (3.093, -39.5, -47, 0.0078, 1890), (3.142, -33.5, -54, 0.0037, 1770),
                  (3.199, -30, -38.5, 0.0027, 2920), (3.25, -39.5, -47, 0.0037, 1860),
                  (3.295, -40.5, -40.5, 0.0028, 4800), (3.36, -38.5, -38, 0.0016, 5200),
                  (3.4823, -37.5, -42.5, 0.0037, 2120), (3.82, -41, -45, 0.0026, 1870),
                  (3.881, -33.5, -41, 0.0035, 2520), (4.026, -39, -47, 0.0018, 5000),
                  (4.037, -35.5, -44, 0.0049, 1980), (4.07, -28, -40, 0.0028, 2330),
                  (4.082, -30.5, -33, 0.0035, 2350), (4.093, -41, -41, 0.0028, 1830),
                  (4.12, -31, -36, 0.0039, 2800), (4.143, -27, -34, 0.0029, 3720),
                  (4.157, -41, -42, .002, 2400), (4.1823, -37, -35.5, 0.0055, 1970),
                  (4.263, -40.5, -50, 0.0043, 6460), (4.274, -41, -45, 0.002, 2270),
                  (4.3244, -26, -40, 0.003, 3650), (4.377, -50, -44, 0.0019, 2400),
                  (4.502, -28, -38.5, 0.002, 3400), (4.563, -39, -45, 0.003, 2300),
                  (4.575, -35, -38.5, 0.0024, 3370), (4.61, -37, -54, 0.0041, 1830),
                  (4.808, -41.5, -47, 0.003, 3400), (4.93, -41, -43.5, 0.0065, 2920),
                  (5.012, -54, -47, .002, 2310), (5.0596, -33.5, -44, 0.0036, 1850),
                  (5.105, -38, -41, 0.014, 4020), (5.177, -36, -43, 0.013, 4440),
                  (5.208, -38, -51, 0.0031, 3300), (5.2655, -38, -50, 0.0017, 2200),
                  (5.367, -44, -48, 0.0015, 2060), (5.405, -44, -54, 0.0014, 3600),
                  (5.618, -34, -55, 0.0018, 1910), (5.637, -33, -32, 0.0021, 2190),
                  (5.678, -32.5, -37.5, 0.0066, 5700), (5.801, -50, -48.5, 0.0082, 2000),
                  (5.8703, -37, -47, .0043, 2320), (6.001, -41, -58, 0.0027, 4050),
                  (6.099, -37.5, -40.5, 0.0057, 2000), (6.171, -34.5, -46, 0.0035, 6430),
                  (6.308, -41.5, -51, 0.0044, 3800), (6.3573, -36.5, -40, .0022, 5100),
                  (6.387, -38.5, -52, 0.003, 4960), (6.406, -40, -43, 0.0014, 2400),
                  (6.426, -29.5, -46, 0.0031, 3280), (6.487, -32, -38, 0.005, 1700),
                  (6.497, -26.5, -33, 0.0034, 1830), (6.531, -29, -44, 0.0066, 5300),
                  (6.548, -24, -58, 0.0021, 1870), (6.561, -37, -44, 0.0044, 5200),
                  (6.579, -38, -46, .003, 4000), (6.6024, -37, -42, 0.005, 4340),
                  (6.623, -45, -46, 0.0062, 4400), (6.666, -41, -50, .002, 2600),
                  (6.68, -42, -54, 0.0041, 5000), (6.726, -33.5, -40, 0.0023, 3300),
                  (6.888, -34.5, -43, 0.012, 3860), (7.079, -42, -44.5, 0.0036, 2340),
                  (7.011, -42, -46, 0.0048, 2000), (7.2756, -30, -36, 0.0029, 3700),
                  (7.613, -44, -43.5, 0.0054, 2000), (7.66, -47, -47, 0.0053, 2300),
                  (7.854, -45, -49, 0.018, 4220), (8.267, -39, -41.5, 0.0033, 3040),
                  (8.3443, -34, -40.5, 0.0031, 5600), (8.838, -44, -47, 0.0037, 2980),
                  (8.848, -38, -48, 0.0017, 1940), (9.009, -47, -45, 0.0037, 5000),
                  (9.0314, -33, -39, 0.0016, 6100), (9.179, -39.5, -53, 0.0047, 2650)]
    grinding, smacking = fist()
    cracks = sorted([tuple(row) for row in big_cracks] + lesser_crunches(grinding))
    powder = squeeze(grinding, smacking) + slow_squeeze() + pops(grinding)
    powder = powder + crunches(cracks) + ticks() + smacks()
    tub = strokes() + push() + lumps() + shake(grinding)
    return ports(tub_air(powder + tub) + room())


def record(dry):
    """The phone cuts the deepest bass and the top."""
    thin = signal.sosfilt(signal.butter(4, 33, "highpass", fs=SR, output="sos"), dry)
    top_hz = 15800
    return signal.sosfilt(signal.ellip(8, .2, 70, top_hz, fs=SR, output="sos"), thin)


dry = scene()
out = record(dry)
unload_wav(out)
```